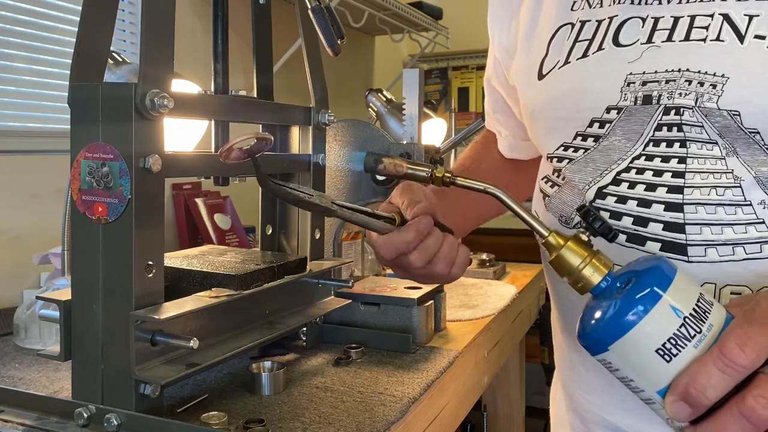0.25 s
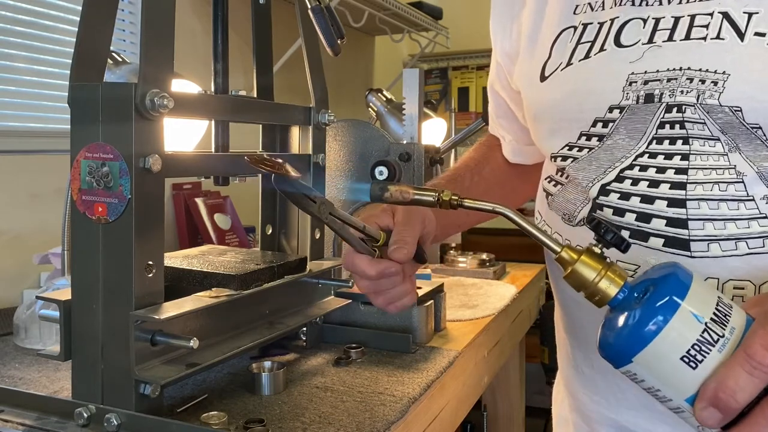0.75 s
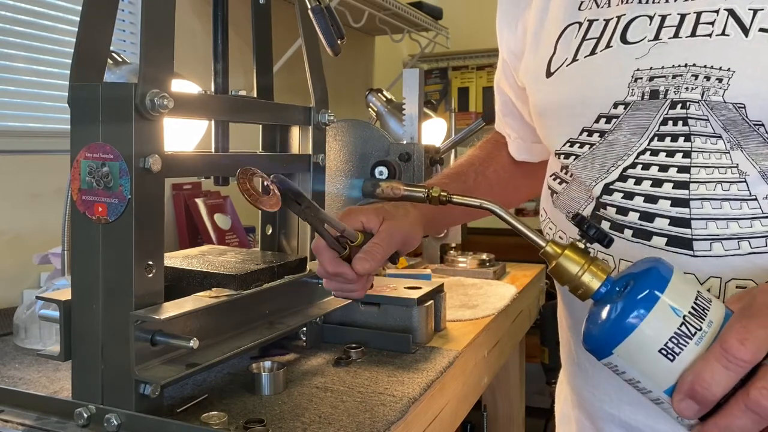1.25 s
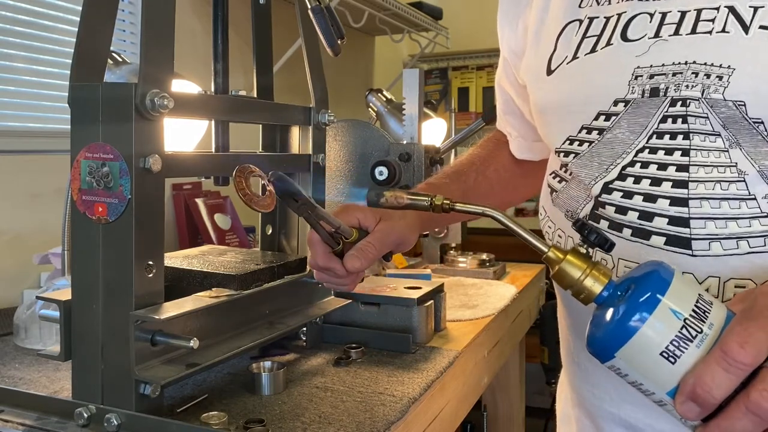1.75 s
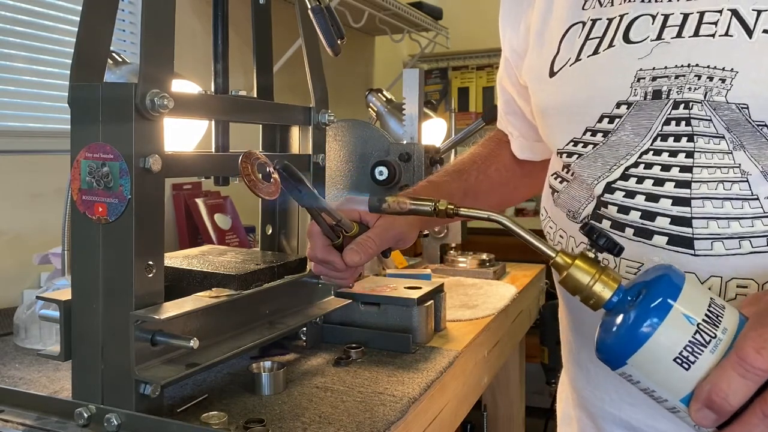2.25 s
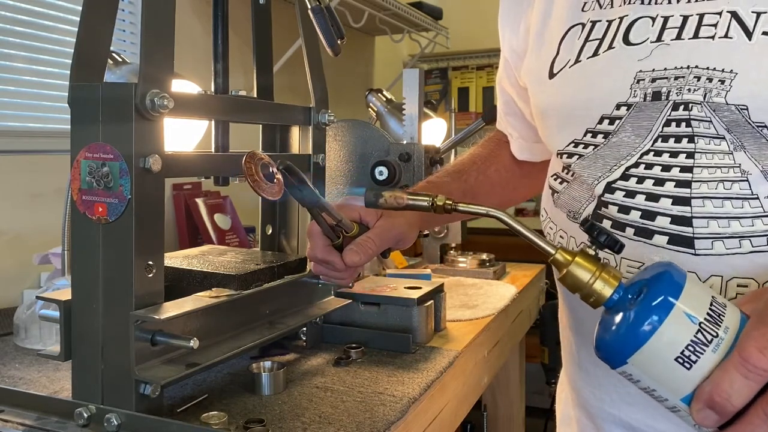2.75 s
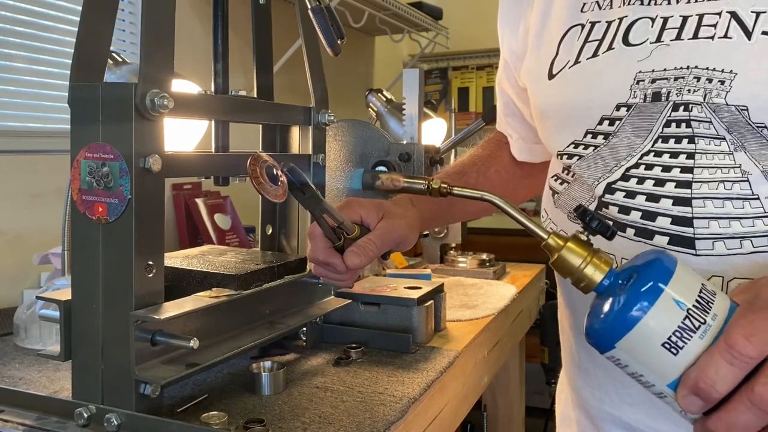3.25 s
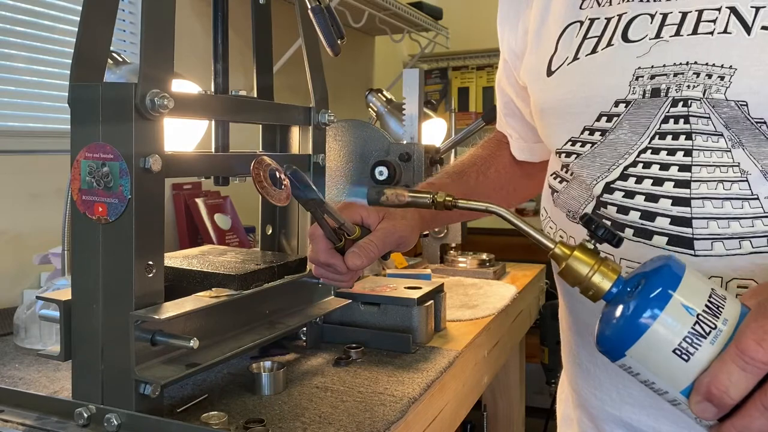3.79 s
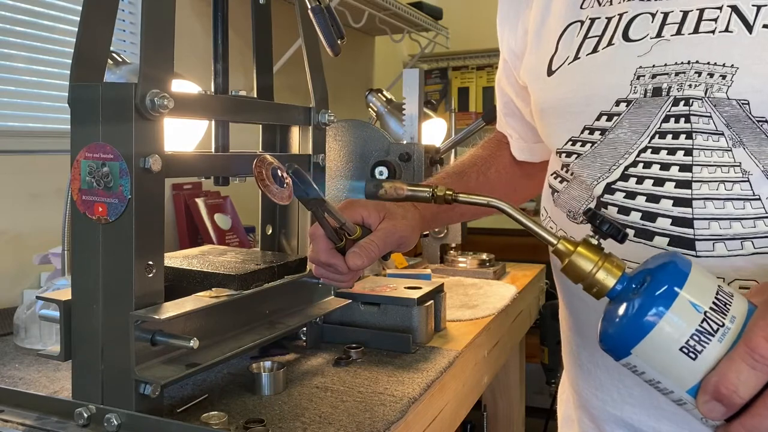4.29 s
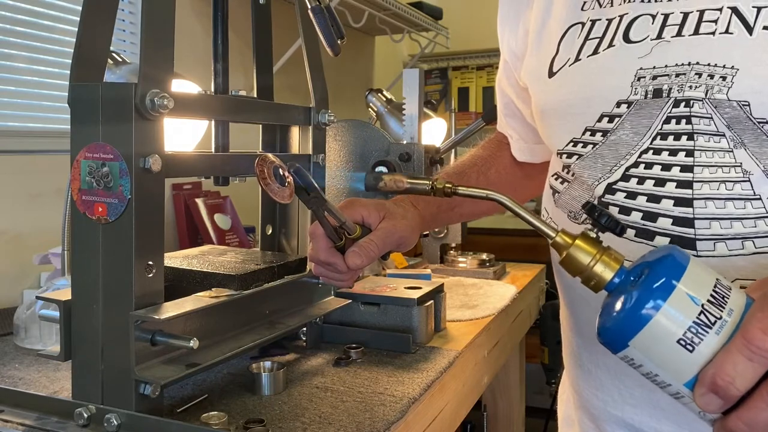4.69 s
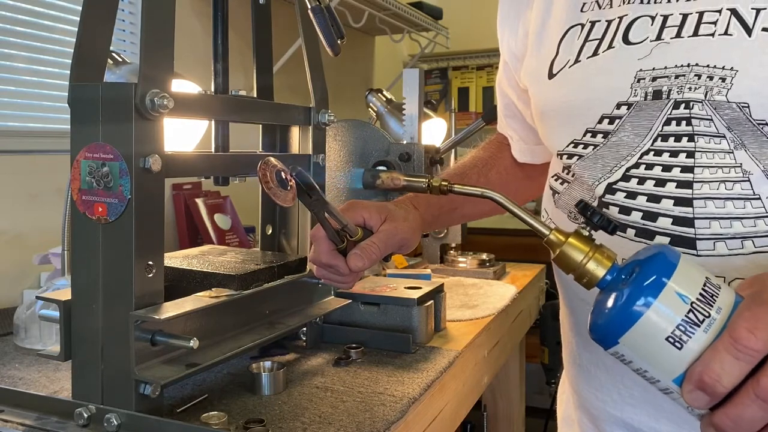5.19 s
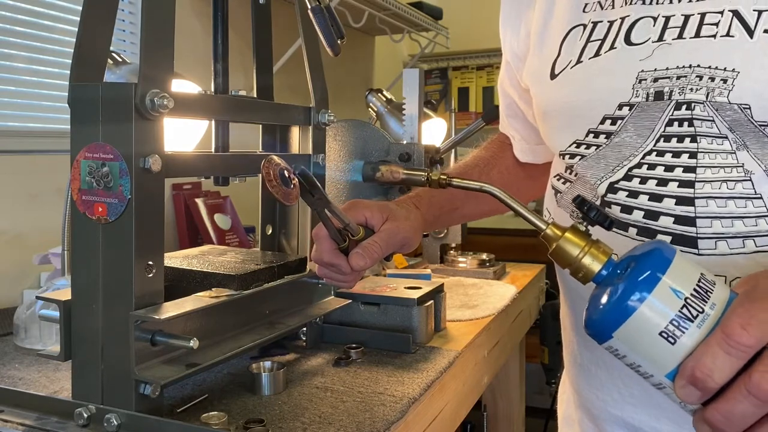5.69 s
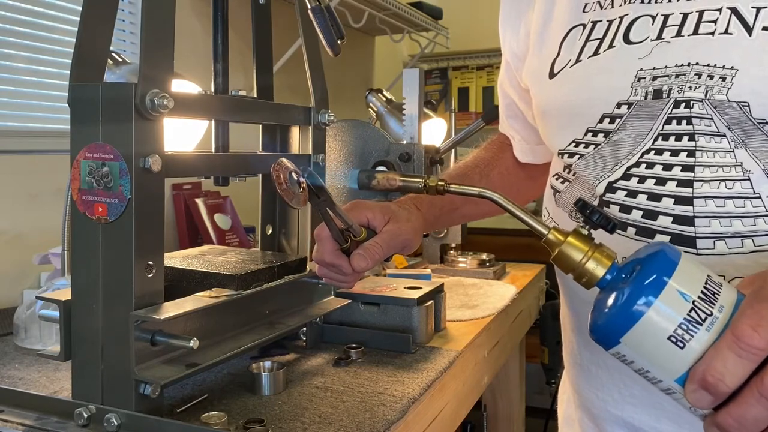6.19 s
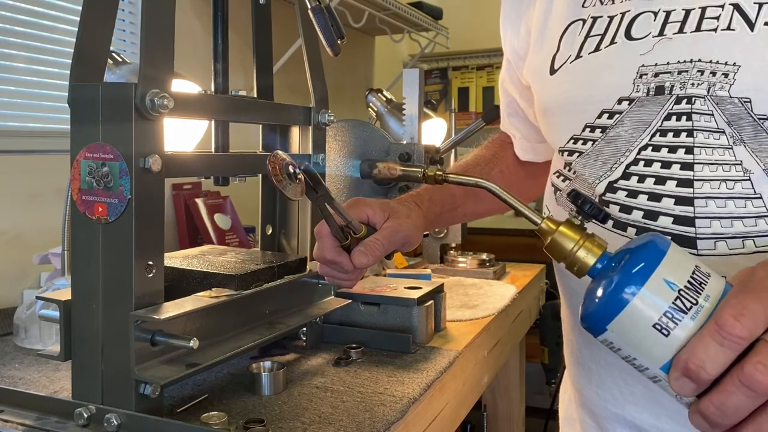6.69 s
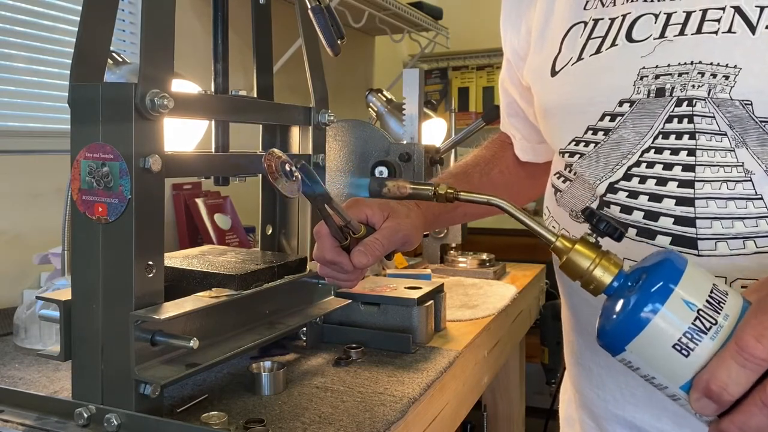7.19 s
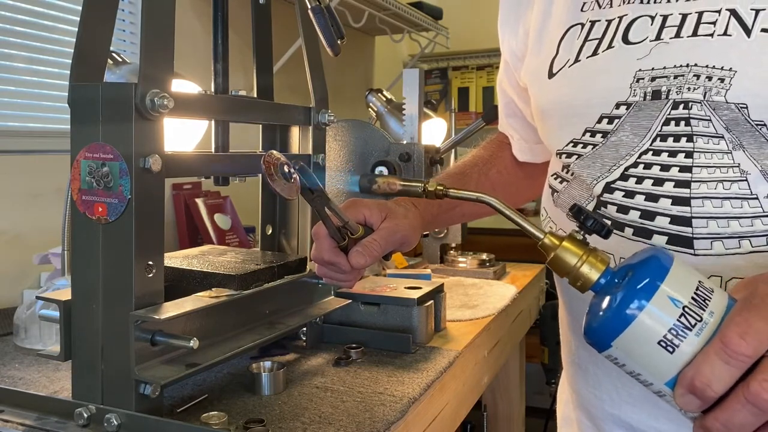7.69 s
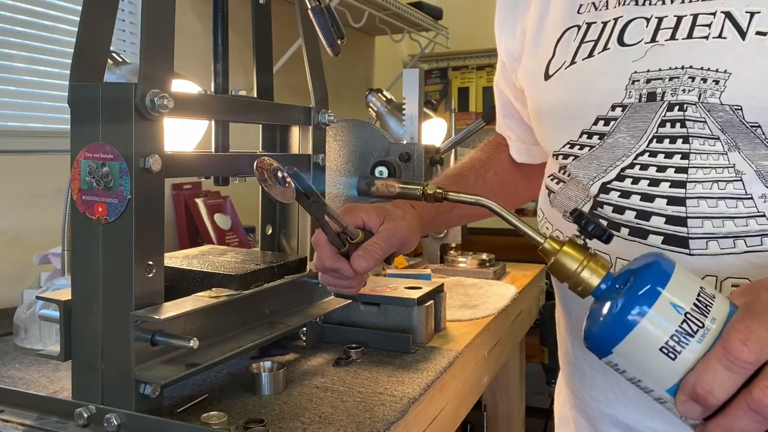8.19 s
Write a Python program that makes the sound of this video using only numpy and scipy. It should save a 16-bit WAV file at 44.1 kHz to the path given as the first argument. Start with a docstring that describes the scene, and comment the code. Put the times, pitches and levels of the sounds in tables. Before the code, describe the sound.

A handheld gas torch, already lit, burns continuously for about 8.5 seconds close to a stereo microphone in a small workshop with very short reverberation. Strong, bright gas hiss sits high, around 6 to 9 kHz, with a rough singing band near 7.5 kHz and a faint, unsteady whistle. That note slides slightly upward over the first 1.5 seconds, then wavers around the same pitch. A thinner airy rush rings near 3 kHz. Underneath, the flame makes a low, soft, turbulent roar with rapid flutter. Small irregular puffs swell and dip, around 0.8, 1.9, 2.3 to 2.6, 3.9, a stronger one at 5.0, then 5.8 to 6.1, 6.8 and 7.8 to 8.0. Subtle echoes off bench and steel shift as the hand sways. Overall loudness is almost constant, rising only very slightly, and the torch is still burning at the end.

```python
"""Gas torch in a small workshop

A handheld torch burns steadily, close to a stereo microphone in a short room, and heats a metal ring held in pliers.
The flame is turbulent noise that roars, flutters and flares; the burner tube rings near 3 kHz with the gas flow.
The jet at the orifice hisses, and the mixing chamber sings in a sliding band of noise with a faint whistle.
Echoes off the bench and a steel frame shift as the hand sways."""
import sys
import numpy as np
from scipy import signal
from scipy.fft import rfft, irfft
from scipy.io import wavfile
from scipy.ndimage import uniform_filter1d, map_coordinates

SR = 44100
rng = np.random.default_rng(int(sys.argv[2]) if len(sys.argv) > 2 else 0)


def file_out(sig):
    """Save sig as 16-bit WAV at sys.argv[1]."""
    # one column per channel
    cols = np.atleast_2d(sig).T
    # limit, then scale
    lim = np.clip(cols, -1, 1)
    pcm = np.round(lim * 32767).astype(np.int16)
    wavfile.write(sys.argv[1], SR, pcm)


N = 372644
TIME = np.arange(N) / SR  # s
FREQ = np.maximum(np.arange(N // 2 + 1) * SR / N, 1)  # Hz

# Nearby surfaces. Each row: echo delay in ms, level in dB before each source's own echo level.
SURFACES = [(2.3, -15), (4.1, -11.5), (6.4, -13.5), (9.7, -17.5), (14.2, -4)]
# Spectrum of the jet at the orifice. Each row: frequency in Hz, relative level in dB per Hz.
JET_SPECTRUM = [(3000, -40), (4900, -20), (5400, -12), (5750, -19), (6150, -5.5), (6330, -10), (6550, -3),
                (6750, .7), (7200, .3), (8400, 0), (8750, -.4), (9050, -3.5), (10000, -8.2), (11000, -11.7),
                (12400, -7.9), (14000, -12.3), (15200, -10.3), (17000, -25)]
# The mixing chamber's band while its note is at CHAMBER_HZ. Each row: frequency in Hz, relative level in dB per Hz.
CHAMBER_BAND = [(6300, -60), (6900, -20), (7100, -9), (7230, -8.5), (7380, -1.5), (7530, 0), (7700, -3),
                (7880, -8.5), (8100, -4.3), (8300, -7.5), (8550, -23), (9000, -60)]
# The chamber's note slides up early on; its faint whistle comes and goes.
# Each row: time in seconds, note in Hz, whistle level in dB.
NOTE = [(0, 7335, -45), (.38, 7345, -45), (.55, 7380, -55), (1.1, 7400, -51), (1.4, 7530, -53),
        (2.9, 7540, -57), (3.7, 7530, -49), (4.3, 7540, -55), (5.7, 7530, -53), (5.9, 7500, -47),
        (6.5, 7550, -48), (7.0, 7540, -51), (7.95, 7530, -47), (8.45, 7500, -49)]
# How the jet reaches the two ports: its direct sound and room share vary with frequency,
# and the room is weakest near 9.2 kHz.
# Each row: frequency in Hz, left minus right in dB, room level in dB, lead of the left port in ms.
JET_PATH = [(5400, -4, -4, .165), (5800, -1.5, -9, .171), (6500, -2, -8, .159), (7000, -.5, -9, .162),
            (7300, 2.2, -10, .169), (8100, 1.1, -11, .167), (8800, 0, -24, .168), (9200, 0, -32, .163),
            (9600, 0, -24, .159), (10200, 0, -12, .161), (11200, 0, -13, .167), (12400, 0, -18, .162),
            (13500, 0, -11, .162), (14400, 0, -14, .162), (14900, 0, -22, .166), (15600, 0, -28, .161)]
# Gas rushing through the burner tube. Each row: frequency in Hz, relative level in dB per Hz.
RUSH_SPECTRUM = [(800, -4), (1800, -2.2), (2200, -3.5), (2600, 4.5), (3300, 4), (4100, -5), (5000, -5),
                 (6000, 0), (8000, -42)]
# Resonances of the burner tube. Each row: frequency in Hz, width in Hz, peak in dB.
TUBE_RESONANCES = [(2460, 70, 4), (2765, 90, 5.3), (2890, 110, 5), (3000, 120, 8.5), (3150, 50, 3),
                   (4090, 80, 2.5)]
# Combustion noise. Each row: frequency in Hz, relative level in dB per Hz.
FLAME_SPECTRUM = [(20, -36), (32, -20), (55, 2.5), (90, -4), (150, -4), (220, -1.13), (310, -2.5),
                  (410, -11.8), (600, -14), (800, -16.5), (1130, -14.5), (1600, -25), (2100, -25),
                  (2400, -26), (5000, -40), (12000, -94)]
# Notes of the roar that the bench and walls favour. Each row: frequency in Hz, width in Hz, peak in dB.
BOOMS = [(113.3, 19, 6.5), (205, 21, 5), (233, 35, 1.5), (434, 28, 3.5), (521, 27, 3), (558, 15, 6),
         (687, 27, 7), (729, 45, 6.5), (914, 47, 3.5)]
# Notes that the clutter throws back sideways. Each row: frequency in Hz, width in Hz, peak in dB.
CLUTTER_NOTES = [(650, 80, 2.5), (1730, 130, 11.5)]
# How much of the roar the clutter scatters. Frequencies in Hz, then levels in dB.
SCATTER_HZ, SCATTER_DB = [30, 80, 250, 600, 1100], [-41, -14, -20.5, -3.5, -9.0]
# Flares and lulls of the flame.
# Each row: centre in seconds, half length in seconds, change of the low roar in dB, change of the flutter in dB.
FLARES = [(.035, .03, 4.5, 0), (.63, .02, -3, 0), (.77, .03, 2.8, 0), (.96, .04, -2, 0),
          (1.23, .05, -2, -2.5), (1.87, .025, 4.5, 1.5), (2.03, .03, -2.5, 0), (2.18, .06, -2.2, -1.2),
          (2.285, .025, 3, 3), (2.37, .02, 1, 3.2), (2.565, .04, 4.3, 2.2), (2.89, .028, -4.5, -.5),
          (2.97, .03, 4.3, 0), (3.08, .02, 1.5, 4), (3.66, .025, -3, 0), (3.9, .04, 3, .8),
          (3.98, .02, 0, 3), (4.99, .035, 4.8, 4.5), (5.075, .025, -2, -2.5), (5.15, .025, 3.5, 1.5),
          (5.82, .06, 3, 2), (5.96, .035, 0, 3), (6.135, .028, 0, 5.5), (6.33, .02, 2.8, 1.8),
          (6.78, .03, 3.3, 2.2), (6.86, .025, 3, 1.8), (7.385, .045, 1.8, 3), (7.78, .03, 3.5, 1),
          (7.95, .025, 5, 1.2), (8.07, .02, 3, 1), (8.3, .02, 2.3, 3)]
# Irregular swell of the deepest part of the roar, below RUMBLE_HZ. Each row: time in seconds, change in dB.
RUMBLE = [(0, 1), (.4, 1.2), (.7, 3.3), (.97, -2), (1.5, -.5), (2.0, .8), (2.55, 1), (3.3, -.5), (4.1, 1.6),
          (4.88, -.5), (5.03, 1.5), (5.3, .2), (5.85, 1), (6.4, 1.8), (6.9, .3), (7.45, -1), (8.45, -1)]

ROOM_T60_S, ROOM_SWAY_MS = 0.14, 0.035  # the hand's sway changes the path into the room
JET_DB, CHAMBER_DB, BURNER_DB = -42.6, -41.4, -47
JET_RISE_DB_PER_S = 0.05  # hiss, chamber and whistle grow slowly louder
CHAMBER_HZ, NOTE_WOBBLE_HZ = 7530, 30.24  # the wobble is the rms wavering of the note
ROAR_DB, ROAR_RISE_DB_PER_S = -39, 0.1  # the roar grows as the metal heats up
FLUTTER_HZ, FLUTTER_RISE_DB_PER_S = 420, 0.07  # large eddies lie below this frequency, small ones above
RUMBLE_HZ = 137
TOP_HZ = 15057


def undb(db):
    """Decibels to gain."""
    return 10 ** (np.asarray(db) / 20)


def unit(x):
    """Scale to rms 1."""
    return x / np.sqrt(np.mean(x ** 2))


def walk(rate):
    """Smooth random wandering of rms 1, no faster than rate per second."""
    knots = rng.standard_normal(N // 32)
    return unit(map_coordinates(knots, [2 * rate * TIME], order=3, mode="wrap"))


def across(table, column=1):
    """A column of a table of (Hz, ...) rows, spread over all frequencies."""
    rows = np.array(table)
    return np.interp(np.log(FREQ), np.log(rows[:, 0]), rows[:, column])


def colour(x, spectrum, resonances=()):
    """Shape a sound with a broad spectrum and resonant peaks, at rms 1."""
    shape_db = across(spectrum)
    for centre, width, peak in resonances:
        shape_db = shape_db + peak / (1 + (2 * (FREQ - centre) / width) ** 2)
    return unit(irfft(rfft(x) * undb(shape_db), N))


def below(x, hz):
    """The part of a sound under a frequency, without delay."""
    return irfft(rfft(x) / (1 + (FREQ / hz) ** 4), N)


def even(x, seconds, amount):
    """Smooth out part of a stereo sound's chance swells; an amount of 1 would level them fully."""
    power = uniform_filter1d(np.mean(x ** 2, axis=0), int(seconds * SR))
    power = uniform_filter1d(power, int(seconds * SR / 2))
    return x * (power / np.mean(power)) ** (-amount / 2)


def eddies(rate, depth_db):
    """Turbulent noise whose strength flutters."""
    return rng.standard_normal(N) * undb(depth_db * walk(rate))


def swayed(x, ms, sway_ms):
    """Delay a sound along a path that the swaying hand lengthens and shortens."""
    delay = (ms + sway_ms * walk(.7)) * SR / 1000  # samples
    return map_coordinates(x, [np.arange(N) - delay], order=3, mode="wrap")


def glance(x, sway_ms, echo_db):
    """Add shifting echoes off nearby surfaces, at rms 1."""
    echoes = sum(undb(db + echo_db) * swayed(x, ms, sway_ms) for ms, db in SURFACES)
    return unit(x + echoes)


def ports(x, lead_ms, pan_db, room_db, alike_hz=450):
    """Two microphone ports: the direct sound leads on the left by lead_ms, the room comes from all sides."""
    t = TIME[:SR // 2]
    tails = rng.standard_normal((2, len(t))) * undb(-60 * t / ROOM_T60_S)
    tails = tails / np.sqrt(np.sum(tails ** 2, axis=1, keepdims=True))
    common, apart = rfft(tails, N)
    left_right = np.array([[1], [-1]])
    # the room fades for long waves, so they reach both ports alike
    spread = FREQ / np.hypot(FREQ, alike_hz)
    tail = spread * (common + left_right * apart) / np.sqrt(2)
    room = tail * rfft(swayed(x, 0, ROOM_SWAY_MS))
    # half the lead and half the level difference fall to each port
    direct = undb(left_right * pan_db / 2) * np.exp(1j * np.pi * FREQ * left_right * lead_ms / 1000)
    return unit(irfft(rfft(x) * direct + undb(room_db) * room, N))


def jet():
    """The orifice hisses; the mixing chamber sings in a rough sliding band, with an unsteady whistle on top."""
    s, note_hz, whistle_db = np.transpose(NOTE)
    hz = np.interp(TIME, s, note_hz) + NOTE_WOBBLE_HZ * walk(9)
    hiss = colour(eddies(rate=33, depth_db=0.84), JET_SPECTRUM) * undb(JET_DB)
    # the chamber's resonances flutter, and shift in frequency along with its note
    drift = np.exp(2j * np.pi * np.cumsum(hz - CHAMBER_HZ) / SR)
    band = colour(eddies(rate=41, depth_db=1.6), CHAMBER_BAND)
    chamber = np.real(signal.hilbert(band) * drift) * undb(CHAMBER_DB)
    # the whistle wanders in strength and phase
    wander = walk(65) + 1j * walk(65)
    whistle = unit(np.real(wander * np.exp(2j * np.pi * np.cumsum(hz) / SR)))
    source = hiss + chamber + whistle * undb(np.interp(TIME, s, whistle_db))
    rise = undb(JET_RISE_DB_PER_S * (TIME - np.mean(TIME)))
    echoed = glance(source * rise, sway_ms=.07, echo_db=-5)
    pan_db, room_db, lead_ms = [across(JET_PATH, column) for column in (1, 2, 3)]
    return ports(echoed, lead_ms, pan_db, room_db) * np.std(source)


def burner():
    """The gas rushes through the tube and rings it near 3 kHz."""
    rush = colour(eddies(rate=30, depth_db=.5), RUSH_SPECTRUM, TUBE_RESONANCES)
    echoed = glance(rush, sway_ms=0.086, echo_db=-13.5)
    return ports(echoed, lead_ms=-0.048, pan_db=-4.5, room_db=-2.5) * undb(BURNER_DB)


def flame():
    """Burning eddies make a low fluttering roar that grows slowly and flares in irregular puffs."""
    # large eddies roll evenly; the small ones come in quick bursts
    small = FREQ / np.hypot(FREQ, FLUTTER_HZ)
    rolling = rfft(rng.standard_normal(N)) * np.sqrt(1 - small ** 2)
    bursts = rfft(eddies(rate=200, depth_db=2.0) * undb(1.38 * walk(16))) * small
    roar = colour(irfft(rolling + bursts, N), FLAME_SPECTRUM, BOOMS)
    heard = ports(roar, lead_ms=.025, pan_db=-.5, room_db=-8, alike_hz=900)
    # the clutter scatters the roar, so the two ports hear it differently
    share = np.interp(FREQ, SCATTER_HZ, undb(SCATTER_DB))
    clutter = colour(eddies(rate=60, depth_db=2.5), FLAME_SPECTRUM, CLUTTER_NOTES)
    scattered = irfft(rfft(clutter) * share, N)
    heard = heard + np.array([[1], [-1]]) * scattered
    # the flutter gains on the low roar as the metal heats
    low_db = 0
    flutter_db = FLUTTER_RISE_DB_PER_S * (TIME - np.mean(TIME))
    for s, length, low_change, flutter_change in FLARES:
        puff = np.exp(-((TIME - s) / length) ** 2)
        low_db = low_db + low_change * puff
        flutter_db = flutter_db + flutter_change * puff
    # between flares the flame burns evenly
    low = below(heard, FLUTTER_HZ)
    flutter = heard - low
    heard = even(low, .06, .7) * undb(low_db) + even(flutter, .08, .3) * undb(flutter_db)
    # the deepest part of the roar swells and sinks irregularly
    rumble_gain = undb(np.interp(TIME, *np.transpose(RUMBLE)))
    heard = heard + below(heard, RUMBLE_HZ) * (rumble_gain - 1)
    return unit(heard) * undb(ROAR_DB + ROAR_RISE_DB_PER_S * TIME)


def scene():
    """One gas flow, wavering slightly, feeds the jet and the burner; the flame roars in front of them."""
    flow = undb(0.35 * walk(7.1))
    return flame() + flow * (burner() + jet())


def record(dry):
    """The recorder cuts the top with a steep low-pass."""
    low_pass = signal.ellip(10, .1, 80, TOP_HZ, fs=SR, output="sos")
    return signal.sosfilt(low_pass, dry)


dry = scene()
out = record(dry)
file_out(out)
```